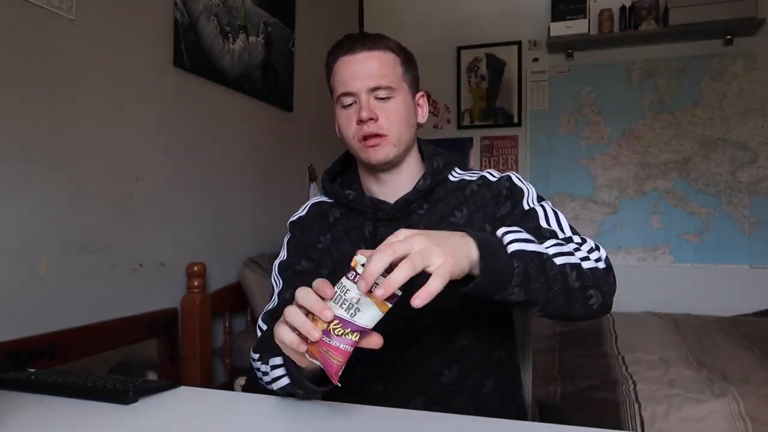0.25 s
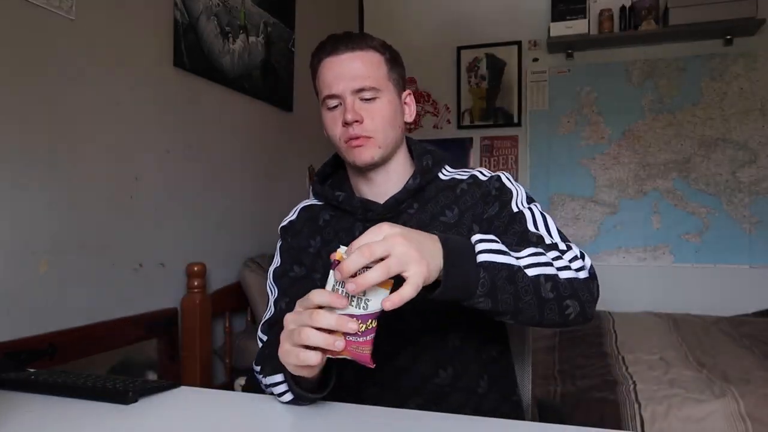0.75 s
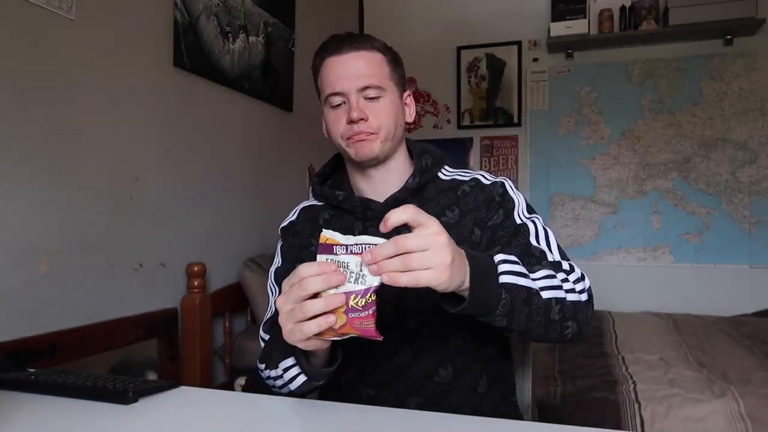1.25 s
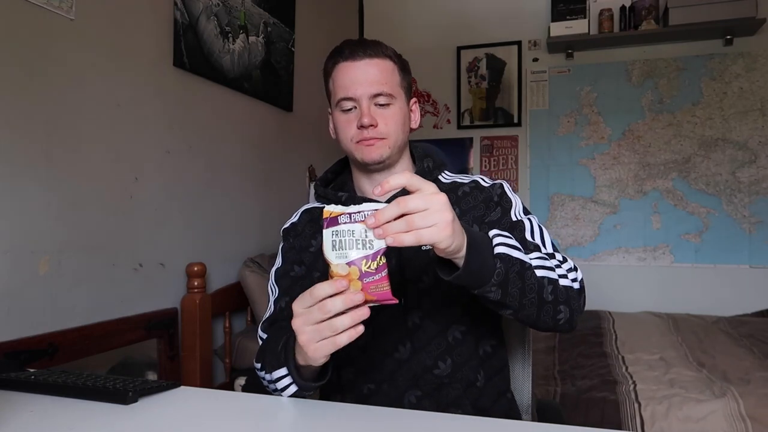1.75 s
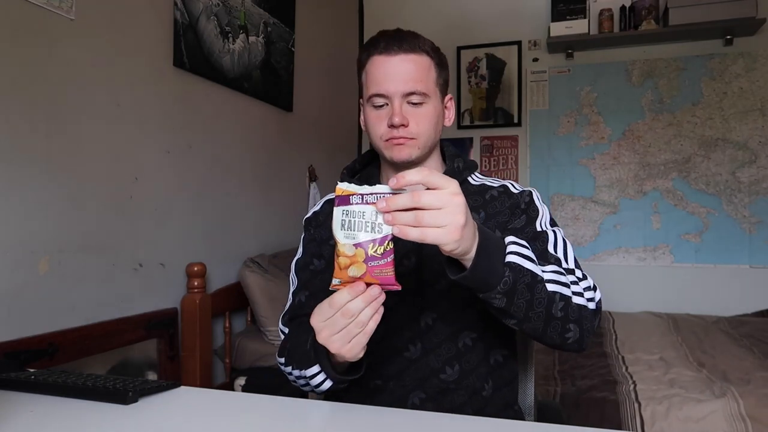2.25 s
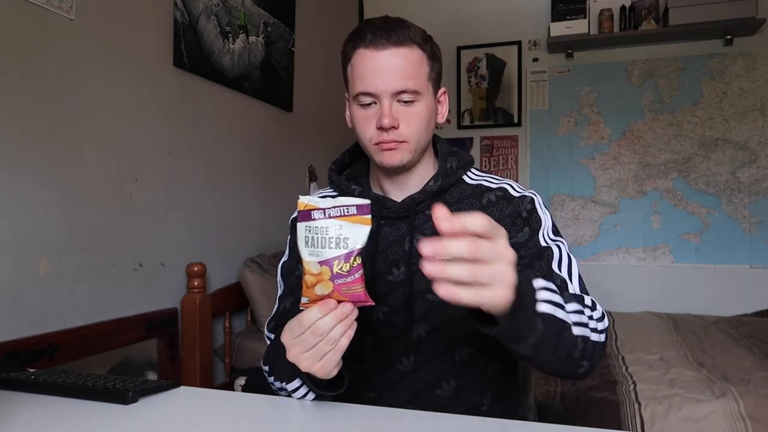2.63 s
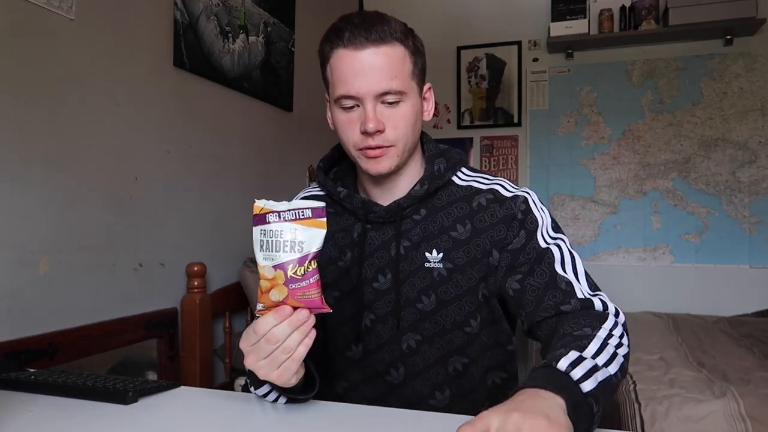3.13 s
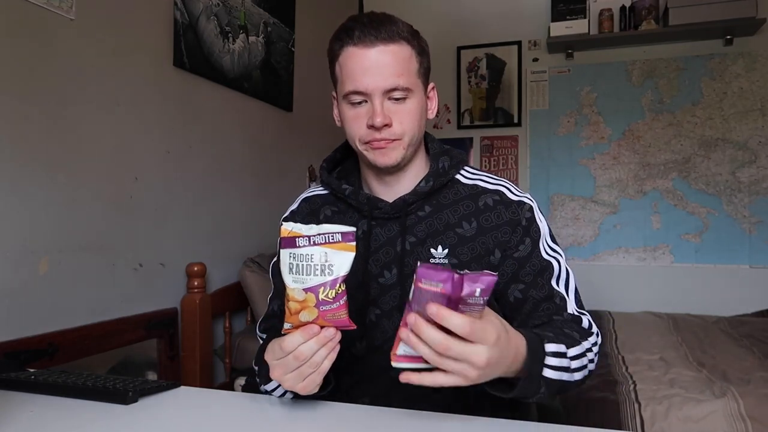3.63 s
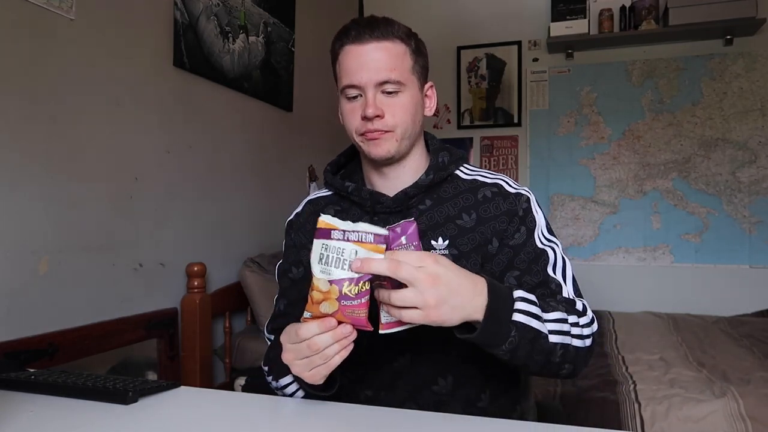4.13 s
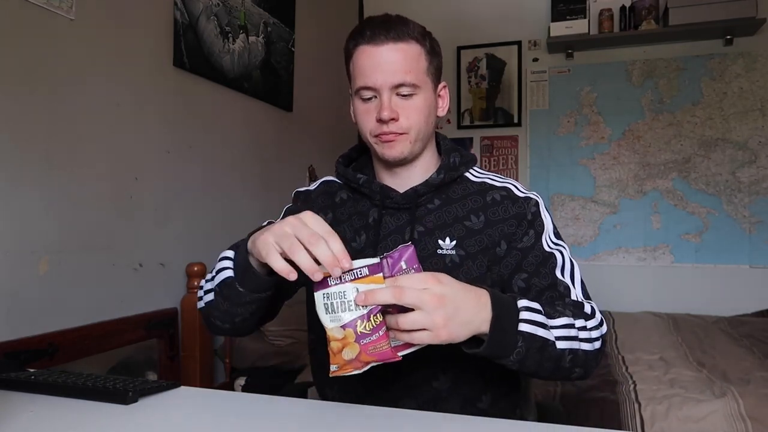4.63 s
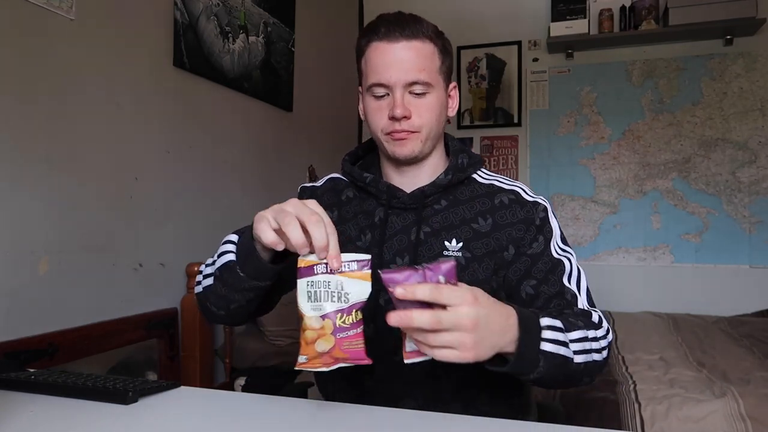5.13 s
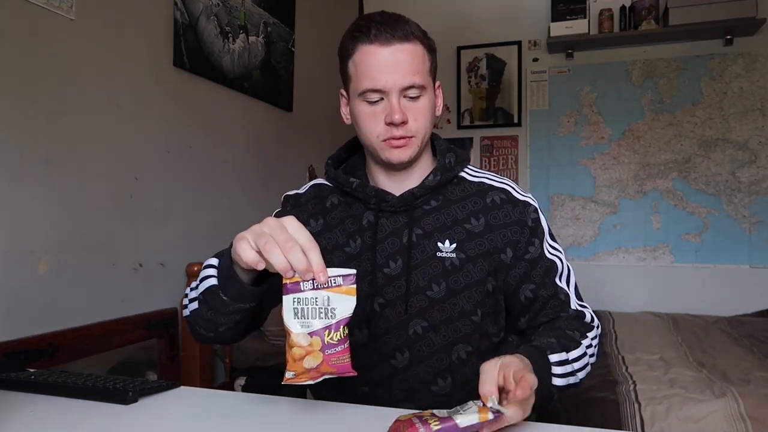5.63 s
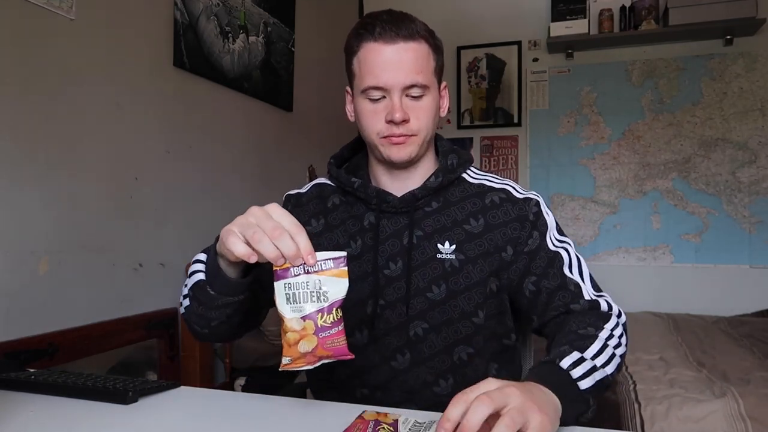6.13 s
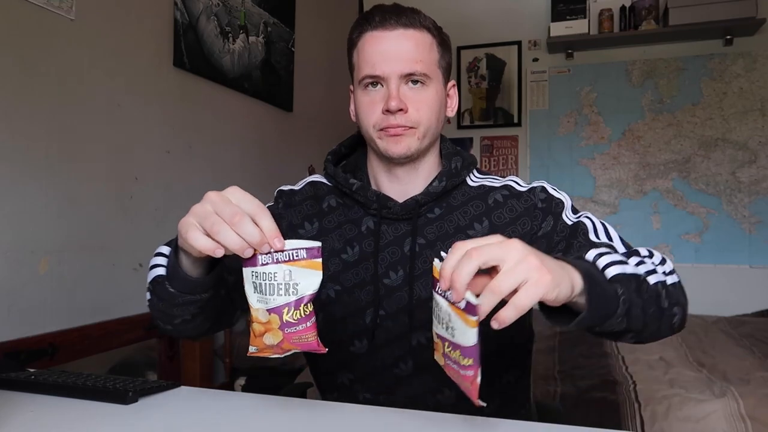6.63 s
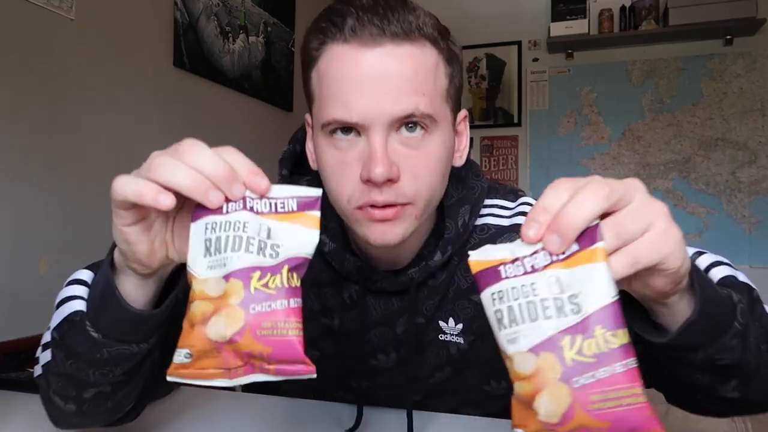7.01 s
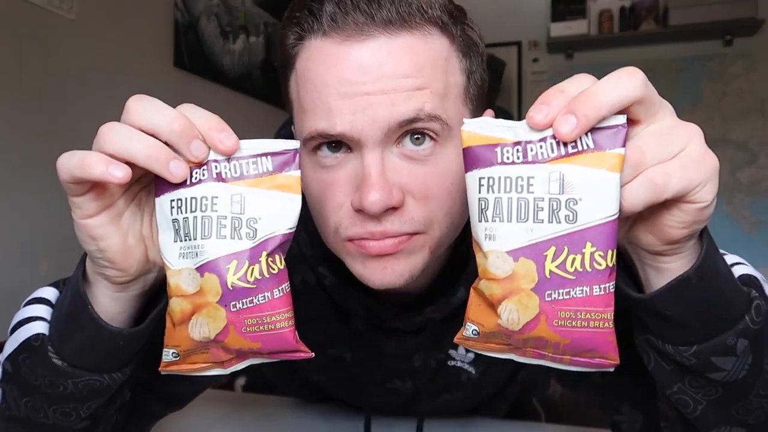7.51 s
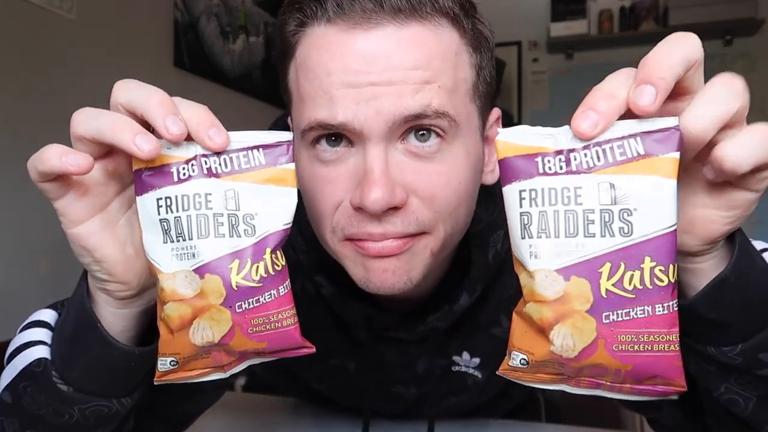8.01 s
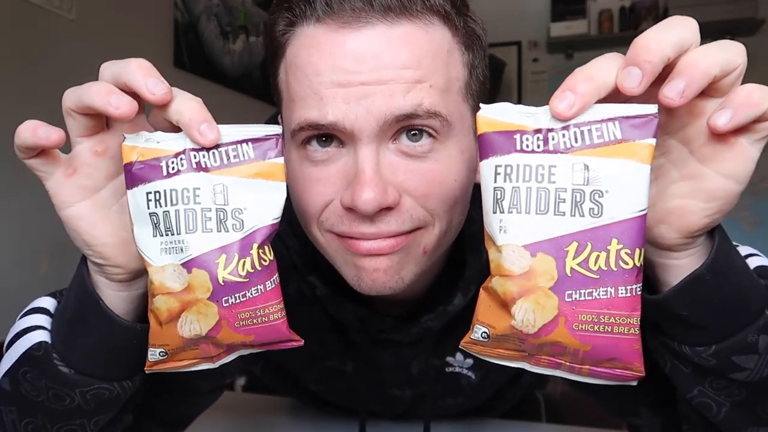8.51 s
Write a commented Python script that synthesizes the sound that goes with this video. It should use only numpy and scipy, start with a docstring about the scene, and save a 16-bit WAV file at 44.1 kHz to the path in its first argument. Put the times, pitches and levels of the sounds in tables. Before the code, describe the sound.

Crisp film packets are crinkled in uneven bursts, creases snapping sharply over dull low bumps, before the handling stops and faint room hush remains.

```python
"""A quiet bedroom, close up: two small plastic snack bags are handled and held out towards a camera.
Buckling creases ring their panels in sharp snaps; taut panels pop and slipping film squeaks as tuned rings.
Streams of tiny grains make the crackle, the hiss on skin and the rub of sleeves; fingertips pat the bags.
Dull thumps sag in pitch and boom in low resonances; a faint deep throb swells and fades over a noise hush.
The small room answers the bags with an early bounce and a short, bright, wide tail."""
import sys
import numpy as np
from scipy import signal
from scipy.fft import rfft, irfft
from scipy.io import wavfile
from scipy.ndimage import uniform_filter1d

SR = 44100
rng = np.random.default_rng(int(sys.argv[2]) if len(sys.argv) > 2 else 0)


def to_wav(sig):
    """Store sig (one row per channel, or 1-D mono) as 16-bit WAV at the path in sys.argv[1].

    Samples outside -1..1 are clipped; the rate is SR.
    """
    pcm = np.clip(np.atleast_2d(sig), -1, 1) * 32767
    pcm = np.round(pcm).astype(np.int16)
    wavfile.write(sys.argv[1], SR, pcm.T)  # frames by channels


N = 386316
TIME = np.arange(N) / SR

# faint crackle and rubbing while the bags are held, before each layer's trim: t/s, crackle/dB, rub/dB
HOLDING = [(0.0, -39.5, -37.5), (0.51, -41, -49.5), (0.68, -61, -38.5), (1.12, -32, -43),
           (1.29, -48, -47.5), (2.27, -49.5, -54.5), (2.61, -59, -51), (3.07, -58, -74), (3.32, -100, -47),
           (4.22, -35, -49), (4.49, -80, -60), (5.02, -56, -65), (5.27, -40, -46), (6.27, -39, -48),
           (6.73, -45.5, -46.5), (7.0, -42, -45), (7.41, -55, -54.5), (8.76, -80, -63.5)]


def undb(db):
    """Decibels to gain."""
    return 10 ** (np.asarray(db) / 20)


def unit(x):
    """Scale to rms 1."""
    return x / np.sqrt(np.mean(x ** 2))


def curve(table, axis):
    """One column of a table, joined by straight lines in time."""
    rows = np.array(table)
    return np.interp(TIME, rows[:, 0], rows[:, axis])


def response(points, size=2048):
    """Causal impulse response with a given colour, from the cepstrum of its log gain."""
    hz, db = np.transpose(points)
    f = np.maximum(np.fft.rfftfreq(size, 1 / SR), 1)
    log_gain = np.log(undb(np.interp(np.log(f), np.log(hz), db)))
    cepstrum = irfft(log_gain)
    # folding the cepstrum forward gives minimum phase
    cepstrum[1:size // 2] *= 2
    cepstrum[size // 2 + 1:] = 0
    return irfft(np.exp(rfft(cepstrum)))


def through(x, impulse):
    """Pass a sound through an impulse response."""
    return signal.fftconvolve(x, impulse)[:len(x)]


def resonate(x, hz, width):
    """Two-pole band-pass, kept below the top of the band."""
    hz = min(hz, .4 * SR)
    return signal.lfilter(*signal.iirpeak(hz, hz / min(width, SR / 5), fs=SR), x)


def resonate_twice(x, hz, width):
    """Two equal band-passes in a row, for steeper skirts."""
    return resonate(resonate(x, hz, width), hz, width)


def add(out, s, x):
    """Mix a short sound in at time s."""
    i = max(int(s * SR), 0)
    out[i:i + len(x)] += x[:len(out) - i]


def walk(order):
    """Slow chance: random levels held for order samples and slewed; spread 1."""
    held = np.repeat(rng.standard_normal(N // order + 1), order)
    return unit(uniform_filter1d(held, order)[:N])


def grains(per_s, spread_db):
    """Random tiny kicks, most weak and a few strong."""
    size_db = spread_db * np.minimum(rng.exponential(size=N), 3.5)
    return (rng.random(N) < per_s / SR) * undb(size_db) * rng.choice([-1, 1], N)


def steady(x, order=1100):
    """Even out the slow level of a sound, keeping its spikes."""
    power = uniform_filter1d(uniform_filter1d(x ** 2, order), order)
    return x / np.sqrt(np.abs(power) + np.mean(x ** 2) / 100)


def air(level_db=-51.5):
    """Steady hush of the room, as coloured noise; returns mid and side."""
    # colour of the hush: f/Hz, level/dB
    hush_colour = [(15, -75), (25, 2), (141, -2.5), (200, -1), (317, -9), (394, -7.5), (863, -18.5),
                   (1440, -17.5), (1740, -23), (2220, -22.5), (4250, -25), (5000, -28), (10100, -37.5),
                   (13600, -44), (16000, -93)]
    # further colour of its side channel: f/Hz, level/dB
    hush_side = [(50, -32), (300, -3), (1500, 1.5), (4000, 1.5), (8000, 1), (14000, 2)]
    mid, side = (unit(through(rng.standard_normal(N), response(hush_colour))) for _ in range(2))
    return undb(level_db) * np.array([mid, through(side, response(hush_side))])


def throbs(length_s=0.098, deep_hz=60, deep_width_hz=30, upper_hz=145, upper_width_hz=65, upper_db=-1):
    """Each throb swells and fades smoothly in two low resonances."""
    # a faint, deep, nearly even throb once the bags are held out: t/s, level/dB
    throb_times = [(8.205, -47.5), (8.305, -40), (8.412, -43.5), (8.527, -46.5), (8.63, -46.5)]
    deep = resonate_twice(rng.standard_normal(N), deep_hz, deep_width_hz)
    upper = resonate_twice(rng.standard_normal(N), upper_hz, upper_width_hz)
    swell = np.zeros(N)
    for s, db in throb_times:
        add(swell, s, undb(db) * np.hanning(int(length_s * SR)))
    return swell * (steady(unit(deep), order=2048) + undb(upper_db) * steady(unit(upper), order=2048))


def thump(hz, length_s, boom_db, rise_s=0.004, fade_s=0.029, sag=0.21, sag_s=0.028, waver=0.038,
          hold_hz=140, size=16384):
    """A soft push sounds one sagging note and booms in low resonances, the higher ones dying first."""
    # low resonances that every thump stirs: f/Hz, width/Hz, level/dB before the thump's own boom level
    boom_modes = [(55, 14, -4), (104, 5.5, -3), (142, 15, -1), (216.4, 45, -8), (260.7, 21, -4)]
    t = np.arange(size) / SR

    def swell(hold_s):
        return (1 - np.exp(-t / rise_s)) * np.exp(-np.maximum(t - hold_s, 0) / fade_s)

    pitch = hz * (1 + sag * np.exp(-t / sag_s) + waver * walk(order=400)[:size])
    note = unit(np.sin(2 * np.pi * np.cumsum(pitch) / SR))
    sound = note * swell(length_s)
    for f, width, db in boom_modes:
        mode = steady(resonate_twice(rng.standard_normal(size), f, width))
        sound = sound + undb(db + boom_db) * mode * swell(length_s * min(hold_hz / f, 1))
    # rms 1 while it lasts
    return sound / np.sqrt(np.mean(sound[t < length_s + fade_s] ** 2))


def thumps():
    """Scattered single thumps, each a soft push with its own note and boom."""
    # dull thumps: t/s, level/dB, pitch it sags to f/Hz, hold before the fade/s, low resonances/dB
    thump_times = [(0.075, -24.5, 137.2, 0.09, -4), (0.214, -25, 131, 0.053, -4),
                   (0.42, -45, 142, 0.062, -16), (0.704, -30, 111.5, 0.092, 2),
                   (0.852, -31.5, 125.2, 0.092, 8), (1.238, -45, 144, 0.02, -21),
                   (1.896, -37.5, 98, 0.073, 3), (2.008, -27.5, 168.6, 0.045, -4.5),
                   (2.08, -40.5, 126, .05, 0), (2.751, -32, 130.2, 0.054, 6),
                   (5.735, -47.5, 161, 0.066, -1), (7.181, -42.5, 89, 0.032, -1),
                   (7.853, -47, 62, 0.076, -8)]
    out = np.zeros(N)
    for s, db, hz, length, boom_db in thump_times:
        add(out, s, undb(db) * thump(hz, length, boom_db))
    return out


def crushing(skew=0.28):
    """Each crush swells and dies away; returns the power of its crackle, rub and hiss."""
    # fingers crush or slide a patch of film: t/s, length/s, level/dB, rub/dB and hiss/dB re level
    crush_times = [(0, 0.094, -39.5, -18, -12), (0.089, 0.068, -34.5, -1, -12), (0.118, 0.05, -26, 3, -8.5),
                   (0.257, 0.069, -34.5, 0.5, -25), (0.319, 0.033, -42.5, -26, 4),
                   (0.432, 0.037, -34, -2, -20), (0.447, 0.1, -30, -3.5, -12),
                   (0.572, 0.027, -25, 0.5, -9.5), (0.705, 0.14, -32.5, -5, -16),
                   (0.855, 0.12, -36, -0.5, -13.5), (0.897, 0.1, -28.5, -16, -15.5),
                   (1.07, 0.061, -31.5, -10, -4), (1.49, 0.04, -55, -12, -7),
                   (1.653, 0.092, -38.5, -1.5, -15), (1.97, 0.13, -52.5, 9, -12),
                   (2.448, 0.051, -44.5, -13, -2), (2.564, 0.079, -38.5, -13, -23),
                   (3.099, 0.052, -41, -11, -10.5), (3.144, 0.055, -30.5, -2.5, -37),
                   (3.257, 0.15, -35.5, -13, -28), (3.435, 0.25, -42.5, -10, -19),
                   (3.69, 0.13, -44, -17, -15), (3.801, 0.17, -39, -6, -17), (3.955, 0.039, -34, -1, -15),
                   (4.18, 0.27, -41, 0, -20), (4.695, 0.13, -52.5, -1, -23), (4.946, 0.076, -59, 12, -9),
                   (5.049, 0.18, -45, -15, -16), (5.111, 0.048, -36.5, 1.5, -24), (5.439, 0.1, -38, 2, -27),
                   (5.543, 0.067, -40, 0.5, -17), (5.732, 0.055, -29.5, -2, -23),
                   (5.785, 0.08, -34, -2.5, -31), (5.902, 0.15, -35.5, -22, -19),
                   (6.104, 0.061, -36.5, -7, -16), (6.139, 0.033, -34, 0, -17),
                   (6.248, 0.17, -37.5, -4, -20), (6.407, 0.15, -35.5, 0.5, -15.5),
                   (6.642, 0.021, -38.5, -1.5, -17), (6.791, 0.021, -25.5, -10, -12),
                   (6.898, 0.15, -43, -21, -22), (7.378, 0.21, -61, 6, -18), (7.918, 0.24, -61.5, 8.5, -26)]
    power = np.zeros((3, N))
    for s, length, db, rub_db, hiss_db in crush_times:
        progress = np.linspace(0, 1, int(length * SR) + 2)
        swell = np.abs(np.sin(np.pi * progress ** skew))  # the skew brings the peak early
        for layer, share_db in zip(power, (0, rub_db, hiss_db)):
            add(layer, s, swell * undb(db + share_db) ** 2)
    return power


def sleeves(power, per_s=700, spread_db=3.0, hold_db=-2):
    """Cloth and palms catch and slip in soft, dark grains."""
    # colour of the cloth: f/Hz, level/dB
    cloth_colour = [(25, -26), (80, -12.5), (200, -1), (315, -1.5), (420, 2.5), (600, 3), (760, -5),
                    (1000, -6), (2500, -1.5), (8000, -44)]
    level = np.sqrt(power + undb(curve(HOLDING, axis=2) + hold_db) ** 2)
    return steady(through(grains(per_s, spread_db), response(cloth_colour))) * level


def hiss(power, per_s=700, spread_db=4, hold_db=-25):
    """Film sliding on skin hisses in fine, bright grains."""
    # colour of the sliding film: f/Hz, level/dB
    slide_colour = [(2000, -8.5), (4500, 5), (7000, -7), (10000, -10), (13000, -12), (14500, -28),
                    (16000, -38)]
    level = np.sqrt(power + undb(curve(HOLDING, axis=1) + hold_db) ** 2)
    return steady(through(grains(per_s, spread_db), response(slide_colour))) * level


def crackle(power, per_s=52, spread_db=2.5, width_share=0.37, patchy_db=1.0, hold_db=-5):
    """Countless small wrinkles tick in panels of every size; the strain wanders from panel to panel."""
    # colour of the fine crackle: f/Hz, level/dB
    wrinkle_colour = [(200, -9.5), (750, -3.5), (1200, -3), (2000, 3), (3000, 2.5), (4500, -3),
                      (7000, -8.5), (12000, -34)]
    panels = np.zeros(N)
    for hz in np.geomspace(1000, 4600, 9):
        ticks = grains(per_s, spread_db) * undb(patchy_db * walk(order=1800))
        panels += resonate(ticks, hz, hz * width_share) / np.sqrt(hz)
    level = np.sqrt(power + undb(curve(HOLDING, axis=1) + hold_db) ** 2)
    return steady(through(panels, response(wrinkle_colour))) * level


def pats(pat_hz=470, width_hz=380, press_s=0.0022, size=2048):
    """A fingertip presses briefly on the taut bag and rings its low, well-damped note."""
    # fingertips land on an air-filled bag with a soft, hollow knock: t/s, level/dB
    pat_times = [(.551, -24.5), (0.769, -25), (1.128, -32.5), (1.472, -31), (1.503, -33.5), (4.337, -29),
                 (5.091, -30.5), (5.119, -27.5), (5.131, -36), (5.24, -28), (5.64, -41), (6.314, -28.5)]
    out, t = np.zeros(N), np.arange(size) / SR
    for s, db in pat_times:
        press = rng.standard_normal(size) * np.exp(-t / press_s)
        knock = resonate_twice(press, pat_hz, width_hz)
        add(out, s, knock * undb(db) / np.sqrt(np.mean(knock[t < 2 * press_s] ** 2)))
    return out


def squeaks(width_share=0.27, size=8192):
    """Slipping film rings one panel, whose pitch rises as it tightens and falls as it slackens."""
    # film slips under a fingertip: t/s, length/s, level/dB, start f/Hz, end f/Hz
    squeak_times = [(0.586, .055, -36.5, 1535, 1090), (2.684, 0.049, -50, 1470, 1830),
                    (3.061, 0.024, -43, 1650, 2000), (4.743, 0.031, -53, 2230, 2500),
                    (4.782, 0.014, -44, 1920, 2110), (7.382, 0.011, -52, 4000, 4100),
                    (8.056, 0.074, -58, 3600, 4010)]
    out = np.zeros(N)
    for s, length, db, start_hz, end_hz in squeak_times:
        count = int(length * SR)
        ring = resonate_twice(rng.standard_normal(size), start_hz, start_hz * width_share)
        note = steady(ring, order=256)
        # reading the note ever faster or slower bends its pitch
        position = np.cumsum(np.linspace(1, end_hz / start_hz, count))
        glide = np.interp(position, np.arange(size), note)
        add(out, s, undb(db) * unit(glide * np.sin(np.linspace(0, np.pi, count))))
    return out


def pops(rise_s=0.001, burst_s=0.0022, ring_s=0.028, knock_hz=560, knock_width_hz=550, knock_db=-15, size=8192):
    """A taut panel rings one short note, a hollow knock from the air behind it, then a faint lingering ring."""
    # taut panels pop: t/s, level/dB, f/Hz, width of each ring filter/Hz, lingering ring/dB re level
    pop_times = [(4.5533, -24, 1460, 850, -11), (4.7935, -29, 2040, 240, -18)]
    out, t = np.zeros(N), np.arange(size) / SR
    burst = (1 - np.exp(-t / rise_s)) * np.exp(-t / burst_s)
    burst = burst / burst.max()
    for s, db, hz, width, ring_db in pop_times:
        chance = rng.standard_normal(size)
        note = unit(np.sin(2 * np.pi * hz * t))
        ring = steady(resonate_twice(chance, hz, width), order=256)
        knock = steady(resonate_twice(chance, knock_hz, knock_width_hz), order=256)
        linger = undb(ring_db) * np.exp(-t / ring_s) * (1 - np.exp(-t / burst_s))
        pop = (note + undb(knock_db) * knock) * burst + ring * linger
        add(out, s, undb(db) * pop / np.sqrt(np.mean(burst[t < 2 * burst_s] ** 2)))
    return out


def snaps(rise_s=0.00044, scrape_s=0.00097, flick=0.2, body_s=0.0015, crack_s=0.00056, crack_rise_s=0.00038,
          widen=1.67, second_db=-10, detune=0.62, ring_top_hz=6000, push_db=-16.5, push_growth=0.76, size=1024):
    """A crease flips: a brief ragged jerk rings its panel, pushes the bag's air and cracks in the treble."""
    # the clearest creases that buckle: t/s, level/dB, panel f/Hz, panel width before widening/Hz,
    # crack/dB re level
    crease_times = [(0.051, -32.5, 2220, 1300, -22), (0.0768, -26.5, 2130, 1700, -4.5),
                    (0.083, -22.5, 2820, 1500, -5), (0.097, -29, 2580, 700, -18),
                    (0.1146, -29, 2500, 1000, -18), (0.122, -19, 2020, 1210, -19),
                    (0.134, -26, 2180, 1400, -9), (0.139, -16, 1820, 1200, -14),
                    (0.1517, -23, 2260, 860, -29), (0.177, -29, 2580, 1200, -11),
                    (0.188, -28, 2060, 1000, -16), (0.264, -40, 2350, 1300, -25),
                    (0.283, -31.5, 2450, 1400, -20), (0.3213, -40, 3320, 1700, -4),
                    (0.3438, -35, 3450, 1500, -6), (0.4272, -36, 2000, 1100, -24),
                    (0.4506, -16, 2390, 1070, -18), (0.4682, -26.5, 2120, 1440, -5),
                    (0.473, -28, 2700, 1200, -16), (0.515, -19, 2590, 1010, -30),
                    (0.5229, -19, 2700, 1210, -29), (0.5507, -27, 890, 550, -35),
                    (0.56, -27, 1450, 1000, -30), (0.566, -24, 2780, 1020, -32),
                    (0.577, -21.5, 1660, 1600, -22), (0.619, -26, 900, 1210, -17),
                    (0.7143, -24, 2060, 610, -16), (0.7425, -30, 2970, 1400, -16),
                    (0.7707, -26.5, 3000, 1430, -9), (0.8043, -29, 2580, 1500, -8),
                    (0.8823, -32, 2000, 1300, -19), (0.9096, -34, 2850, 1500, -16),
                    (0.916, -25, 2180, 1200, -13), (0.938, -25, 2390, 1430, -34),
                    (0.958, -28.5, 2370, 1700, -1.5), (0.972, -28, 2390, 800, -24),
                    (1.001, -20.5, 2190, 1000, -10), (1.0519, -35, 2500, 990, -30),
                    (1.082, -16.5, 2440, 1480, -14), (1.1015, -26, 2020, 1210, -25),
                    (1.1158, -24, 1940, 960, -26), (1.1282, -20.5, 2150, 1410, -27),
                    (1.148, -28.5, 2770, 900, -25), (1.1833, -35, 2320, 1000, -19),
                    (1.2373, -22, 2110, 1010, -24), (1.2478, -18, 1870, 1480, -16),
                    (1.257, -19.5, 2050, 1470, -17.5), (1.3138, -29.5, 1630, 910, -18),
                    (1.3719, -33.5, 1510, 1210, -28), (1.3897, -31, 1280, 1210, -29),
                    (1.472, -27.5, 2550, 860, -20), (1.508, -33, 2370, 1000, -22),
                    (1.523, -31.5, 2770, 1710, -10), (1.553, -33.5, 2800, 900, -36),
                    (1.6327, -32, 2080, 1200, -18), (1.6617, -34, 2040, 700, -18),
                    (1.6838, -28.5, 1530, 855, -24), (1.7029, -29.5, 1880, 1200, -10.5),
                    (1.7316, -33.5, 2480, 1500, -12), (1.7823, -30, 2460, 1800, -6.5),
                    (1.9028, -36, 1850, 1000, -22), (1.955, -26, 2360, 1030, -15.5),
                    (1.9947, -24, 2240, 1470, -15), (2.008, -33, 3280, 1500, -10),
                    (2.0657, -31.5, 2540, 1700, -5.5), (2.1667, -41.5, 1850, 1210, -9),
                    (2.318, -35, 1790, 1680, -30), (2.402, -36, 2010, 960, -20),
                    (2.4591, -23, 2280, 1670, -11), (2.56, -27.5, 1900, 1430, -9.5),
                    (2.5732, -26.5, 2780, 900, -26), (2.611, -28, 2020, 1210, -19),
                    (2.7374, -24.5, 2330, 1020, -23.5), (2.8126, -29, 2260, 1230, -19.5),
                    (2.883, -35.5, 1040, 900, -20), (3.1266, -24, 1720, 1000, -32),
                    (3.1353, -29, 2070, 850, -30), (3.1626, -10.5, 1800, 1650, -18),
                    (3.1746, -14.5, 1940, 1900, -11), (3.1819, -16.5, 1830, 1800, -11),
                    (3.193, -31, 2500, 1300, -18), (3.2594, -23.5, 2700, 1420, -3),
                    (3.2764, -32, 2700, 1500, -11), (3.316, -31, 2680, 1200, -25),
                    (3.3611, -32, 1930, 1290, -15), (3.39, -33.5, 2010, 1200, -24),
                    (3.4112, -41, 2270, 1400, -14), (3.4384, -35, 3000, 1200, -18),
                    (3.4597, -33, 2380, 1200, -25), (3.507, -23.5, 3070, 750, -9),
                    (3.5312, -36, 3130, 600, -16), (3.5637, -27.5, 2650, 1200, -34),
                    (3.5742, -29, 2420, 1100, -7), (3.6148, -25.5, 2880, 740, -22),
                    (3.6756, -36, 2680, 1100, -21), (3.713, -38, 2670, 1000, -22),
                    (3.7229, -31, 2540, 600, -18), (3.754, -30.5, 2270, 860, -15),
                    (3.778, -29, 2230, 900, -25), (3.8072, -25, 2900, 1400, -6),
                    (3.8323, -21.5, 2520, 613, -11.5), (3.8451, -22, 2260, 860, -18),
                    (3.86, -24.5, 2370, 650, -7), (3.9501, -26, 2440, 1420, -17),
                    (3.9589, -23, 2850, 1100, -15), (4.0403, -38.5, 2300, 500, -33),
                    (4.1391, -37, 2130, 1300, -12), (4.184, -22.5, 2540, 1440, -19),
                    (4.195, -23, 2140, 1700, -13), (4.2102, -29, 2200, 1200, -6),
                    (4.256, -27.5, 2280, 1700, -4.5), (4.2836, -32, 2740, 1200, -3.5),
                    (4.3245, -23, 2600, 1750, -35), (4.3389, -24, 1600, 1440, -10),
                    (4.5527, -26.5, 1560, 1510, -17), (4.666, -48.5, 2400, 1200, -23),
                    (4.7096, -33, 2700, 1310, -21), (4.794, -35, 2110, 1300, -15),
                    (4.985, -44, 2360, 860, -3), (5.062, -23.5, 2840, 726, -7.5),
                    (5.0925, -28.5, 2600, 800, -28), (5.118, -26.5, 2760, 1020, -13),
                    (5.13, -30, 2600, 550, -22), (5.181, -34, 2150, 1200, -20),
                    (5.1857, -24, 2730, 1010, -9.5), (5.239, -33, 1870, 1200, -17),
                    (5.298, -29, 2420, 990, -22), (5.3519, -29.5, 3100, 1720, -13),
                    (5.392, -33, 2170, 950, -31), (5.438, -28, 3430, 1700, -6),
                    (5.474, -25, 1990, 1440, -32), (5.546, -33.5, 1640, 800, -30),
                    (5.5742, -35, 2380, 1200, -26), (5.624, -34, 1670, 900, -31),
                    (5.6323, -24.5, 2430, 595, -33), (5.639, -22, 1580, 800, -28),
                    (5.7127, -25, 2080, 1100, -15.5), (5.734, -40, 2210, 1500, -19),
                    (5.7421, -39, 2420, 1400, -8), (5.778, -33, 1620, 1000, -28),
                    (5.8005, -35, 2140, 1400, -28), (5.8058, -23.5, 1810, 1100, -34),
                    (5.8141, -31, 2160, 900, -24), (5.8259, -25, 2450, 800, -32),
                    (5.9204, -35, 2580, 1300, -13), (5.945, -33.5, 2830, 1500, -2),
                    (6.0086, -41, 2170, 1200, -26), (6.0614, -33.5, 2460, 1520, -25),
                    (6.1076, -37, 1040, 900, -17), (6.1301, -29, 2250, 700, -20),
                    (6.1525, -24.5, 2680, 1010, -15), (6.159, -25.5, 2400, 1000, -11),
                    (6.168, -26.5, 2330, 700, -12), (6.2578, -31, 3300, 1000, -15),
                    (6.2675, -17.5, 1450, 960, -18), (6.2871, -27.5, 2360, 1000, -15),
                    (6.2974, -27, 2220, 1100, -10), (6.3144, -17.5, 2140, 840, -38),
                    (6.3337, -28, 2110, 1020, -3.5), (6.376, -33, 2650, 1400, -27),
                    (6.396, -28, 2190, 1000, -26), (6.4183, -22.5, 2100, 1700, -11),
                    (6.4265, -27, 2470, 1690, -4), (6.433, -23.5, 2870, 900, -5.5),
                    (6.4635, -24, 2020, 1430, -13), (6.498, -32.5, 1690, 1400, -13),
                    (6.648, -23.5, 2870, 890, -24), (6.7821, -31, 2220, 860, -27),
                    (6.7989, -29.5, 2070, 1210, -4), (6.8754, -30.5, 1640, 1420, -35),
                    (6.9069, -36, 2500, 1100, -20), (6.9501, -26.5, 1880, 610, -20),
                    (6.9836, -24.5, 2330, 1020, -6), (7.0148, -31.5, 2340, 1000, -24),
                    (7.062, -23, 1950, 1210, -29), (7.0752, -20, 2240, 860, -12.5),
                    (7.134, -21, 1680, 1010, -23), (7.175, -25, 2000, 1430, -15.5),
                    (7.225, -37.5, 2000, 800, -15), (7.288, -38, 1420, 400, -20),
                    (7.433, -39, 1650, 1680, -33), (7.779, -44.5, 1270, 610, -18),
                    (7.844, -36.5, 2550, 2300, -17), (7.845, -29.5, 1430, 1850, -35),
                    (7.937, -42, 1360, 550, -30), (7.9892, -44, 756, 600, -24),
                    (8.199, -40.5, 2150, 1280, -32)]
    # colour of the push on the bag's air: f/Hz, level/dB
    push_colour = [(25, -19), (70, -15), (150, -9), (250, 11), (320, 0.5), (420, 15), (600, 8.5),
                   (740, 1.5), (950, 8), (1500, 10), (3000, -39.5)]
    # colour of the treble crack: f/Hz, level/dB
    crack_colour = [(1500, -29), (3500, 26.5), (5000, 22.5), (7000, 15), (10500, 2.5), (13000, 6),
                    (14500, -12), (16000, -13)]
    out, t = np.zeros(N), np.arange(size) / SR
    body, crack = response(push_colour), response(crack_colour)
    soften = signal.butter(2, ring_top_hz, fs=SR)
    first = t < .005  # each part is levelled over its first 5 ms

    def ring_panel(kick, hz, band):
        return resonate(resonate_twice(kick, hz, band), hz, band)

    for s, db, hz, width, high_db in crease_times:
        chance = rng.standard_normal(size)
        jerk = chance * (1 - np.exp(-t / rise_s))
        kick = signal.lfilter(*soften, (t == 0) + flick * jerk * np.exp(-t / scrape_s))
        # the panel across the crease rings at a nearby pitch, nearer when the panel's band is narrow
        other_hz = hz * 2 ** (detune * width / hz * np.clip(chance[-2], -1.5, 1.5))
        band = width * widen
        ring = ring_panel(kick, hz, band) + undb(second_db) * ring_panel(kick, other_hz, band)
        push = through(jerk * np.exp(-t / body_s), body)
        tear = chance * (1 - np.exp(-t / crack_rise_s)) * np.exp(-t / crack_s)
        # the air in the bag gives way softly, so its push grows more slowly than the snap
        parts = [(ring, db), (push, push_db + push_growth * db), (through(tear, crack), db + high_db)]
        snap = sum(part * undb(part_db) / np.sqrt(np.mean(part[first] ** 2)) for part, part_db in parts)
        add(out, s, snap * np.sign(chance[-1]))  # a crease may flip in or out
    return out


def scatter(x, fade, order=4096):
    """Reflections under an envelope; the bags keep moving, so each moment meets its own pattern."""
    out = np.zeros(N)
    for i in range(0, N, order):
        pattern = rng.standard_normal(len(fade)) * fade
        add(out, i / SR, signal.fftconvolve(x[i:i + order], pattern))
    return out


def room(x, t60_s=0.19, tail_db=-7.0, build_s=0.001, bounce_s=0.00628, bounce_width_s=.0011,
         side_bounce_db=-11, size=16384):
    """Direct sound, a bright cluster of early bounces and a short tail; returns mid and side."""
    # colour of the early bounce: f/Hz, level/dB
    bounce_colour = [(300, -7.5), (2000, -12), (3500, -11), (5000, -7.5), (8000, -0.5), (13000, 4)]
    # colour of the tail in the centre: f/Hz, level/dB
    tail_mid = [(100, 12.2), (400, 2.7), (800, 3.2), (2000, 2.6), (3200, 1), (5000, 5.7), (8000, 10.5),
                (13000, 1.2)]
    # colour of bounce and tail at the sides: f/Hz, level/dB
    tail_side = [(100, -41), (350, -56), (800, -9.5), (1600, -23), (2800, -13.5), (4500, 1), (7000, 8.5),
                 (10000, 16.5), (14000, 13)]
    # colour of the direct sound's side channel: f/Hz, level/dB
    direct_side = [(100, -51), (1500, -29), (3000, -19), (5000, -13), (8000, -14), (14000, 0)]
    t = np.arange(size) / SR
    decay = undb(-60 * t / t60_s) * (1 - np.exp(-t / build_s))
    tail = undb(tail_db) * unit(decay) / np.sqrt(size)
    bounce = unit(np.exp(-((t - bounce_s) / bounce_width_s) ** 2)) / np.sqrt(size)
    early = through(scatter(x, bounce), response(bounce_colour))
    late = through(scatter(x, tail), response(tail_mid))
    # the two microphone ports sit close together, so mostly the treble differs between them
    wide = scatter(x, np.hypot(tail, undb(side_bounce_db) * bounce))
    side = through(x, response(direct_side)) + through(wide, response(tail_side))
    return np.array([x + early + late, side])


def scene():
    """Bags and sleeves in the room, thumps and throb in the centre; returns left and right."""
    crush, rub, slide = crushing()
    film = snaps() + pops() + squeaks() + crackle(crush) + hiss(slide)
    mid, side = room(film + pats() + sleeves(rub)) + air()
    mid = mid + thumps() + throbs()
    return np.array([mid + side, mid - side])


def record(dry, ceiling=.93, top_hz=16000):
    """The camera clips just under full scale and cuts the top."""
    clipped = np.clip(dry, -ceiling, ceiling)
    return signal.sosfilt(signal.ellip(8, .2, 70, top_hz, fs=SR, output="sos"), clipped)


dry = scene()
out = record(dry)
to_wav(out)
```